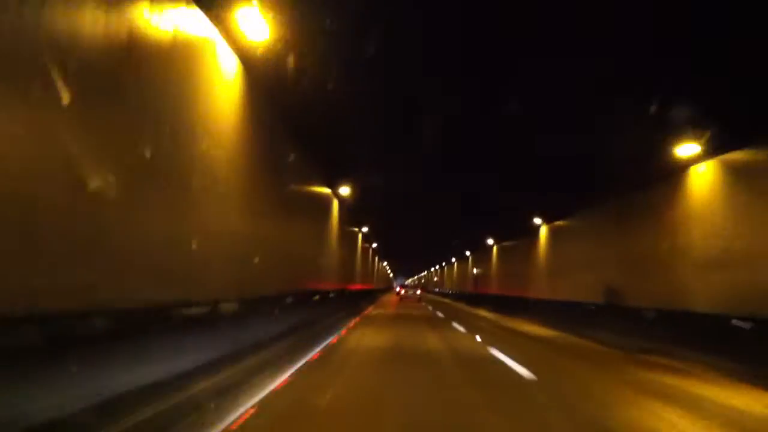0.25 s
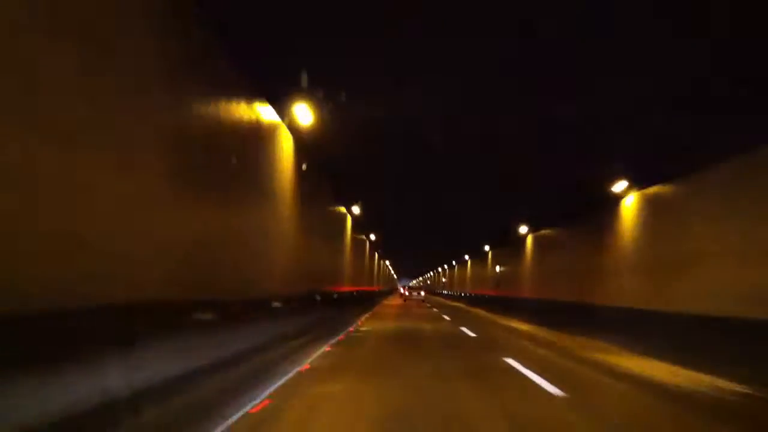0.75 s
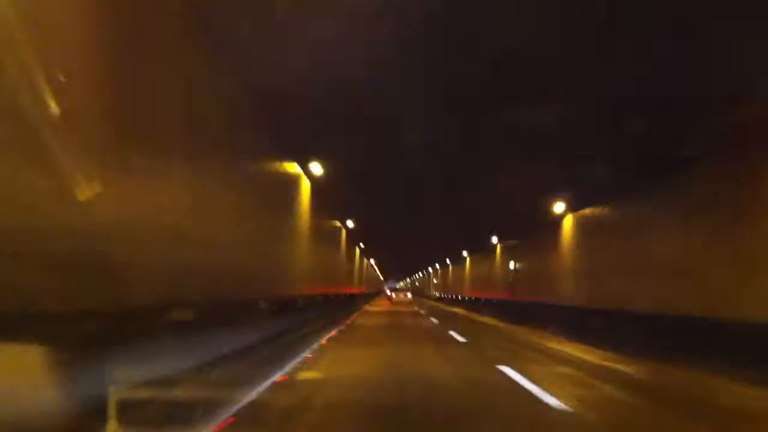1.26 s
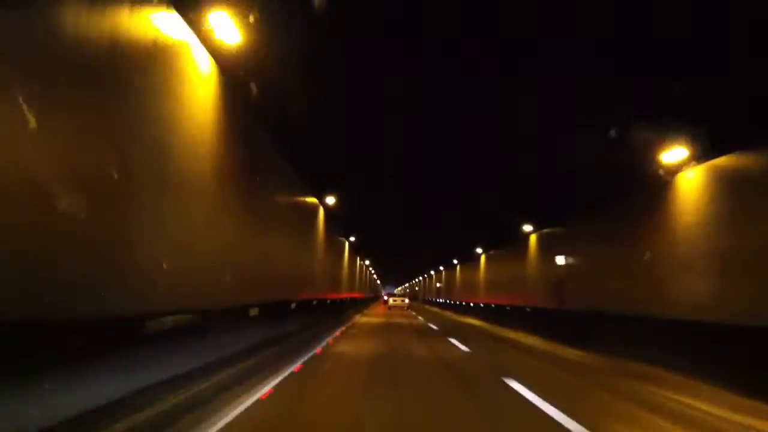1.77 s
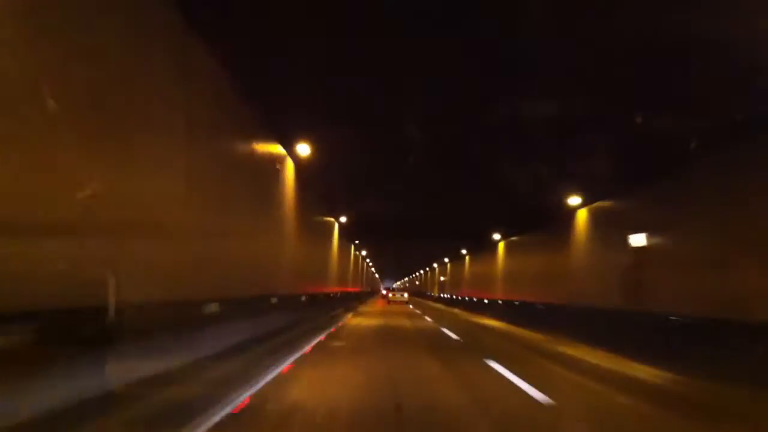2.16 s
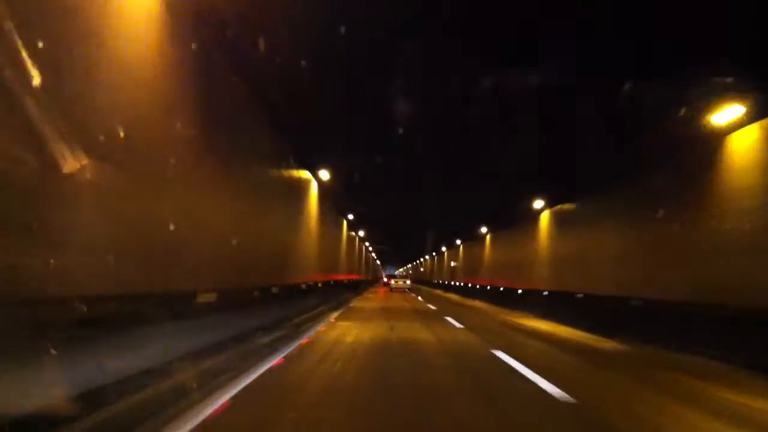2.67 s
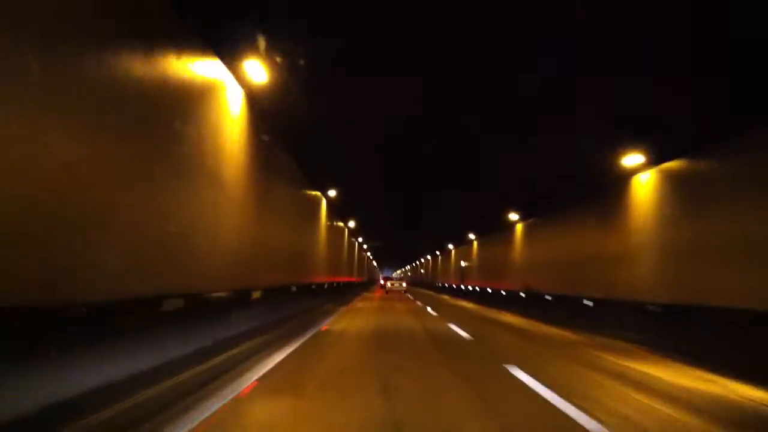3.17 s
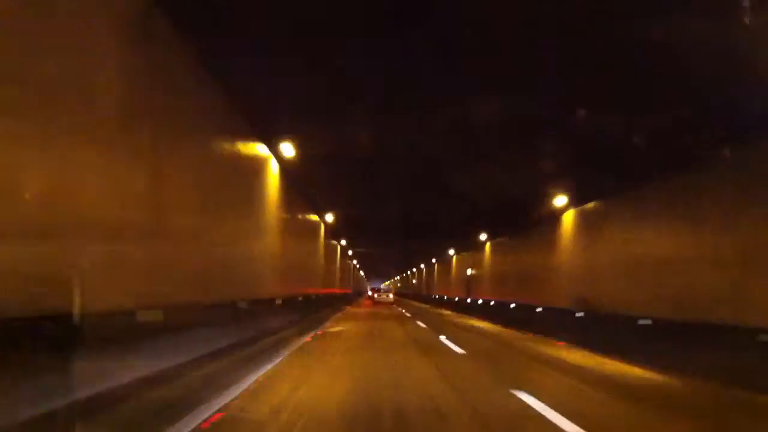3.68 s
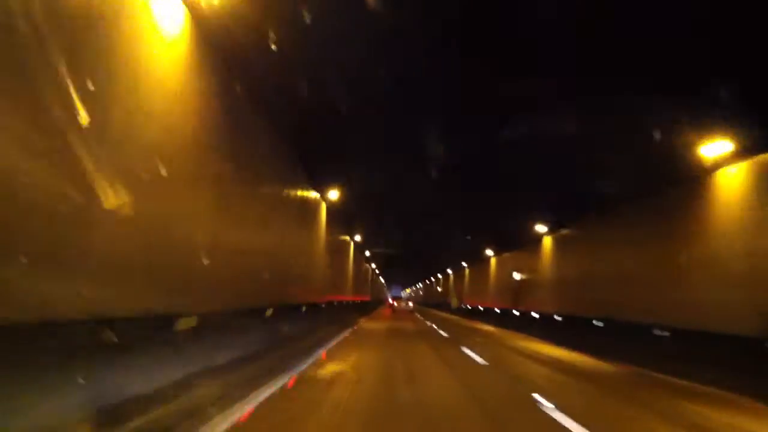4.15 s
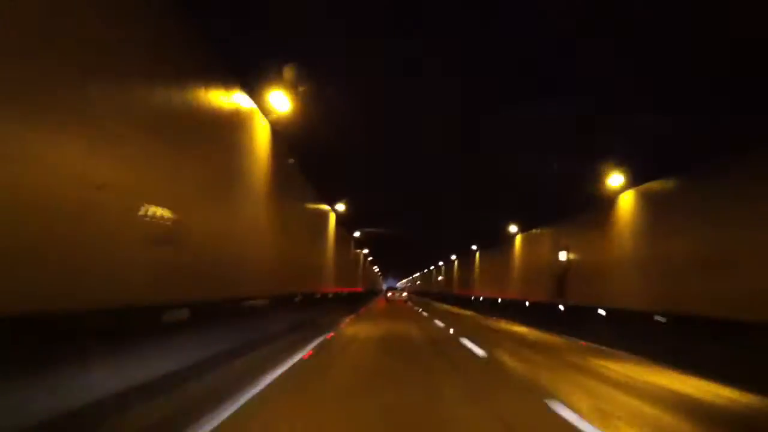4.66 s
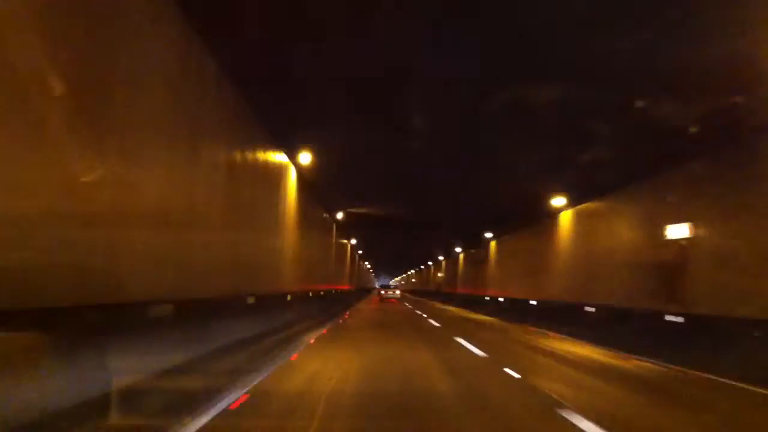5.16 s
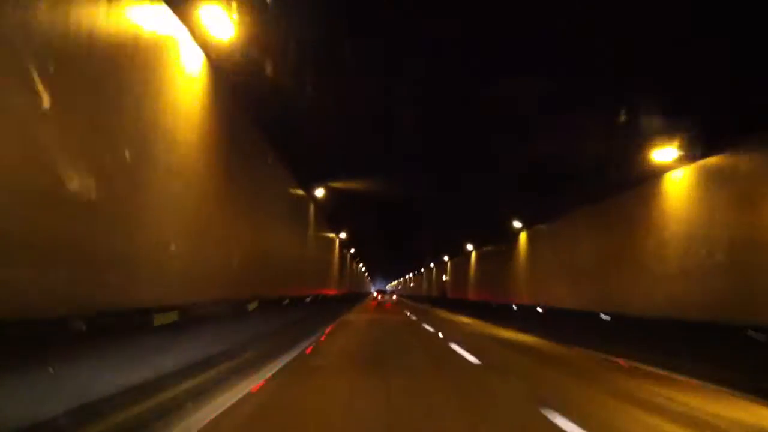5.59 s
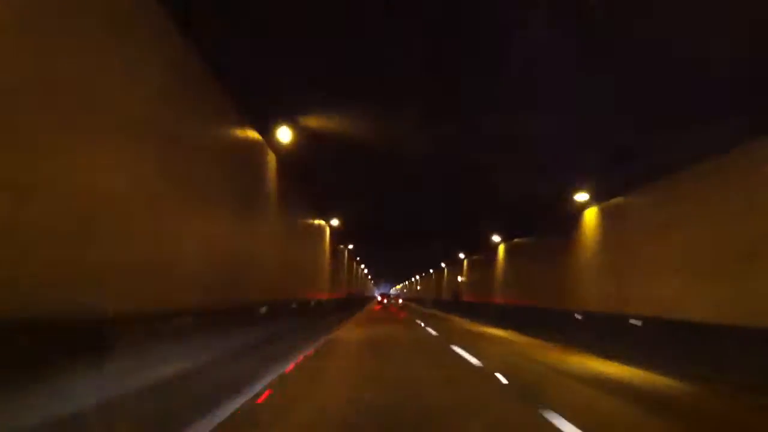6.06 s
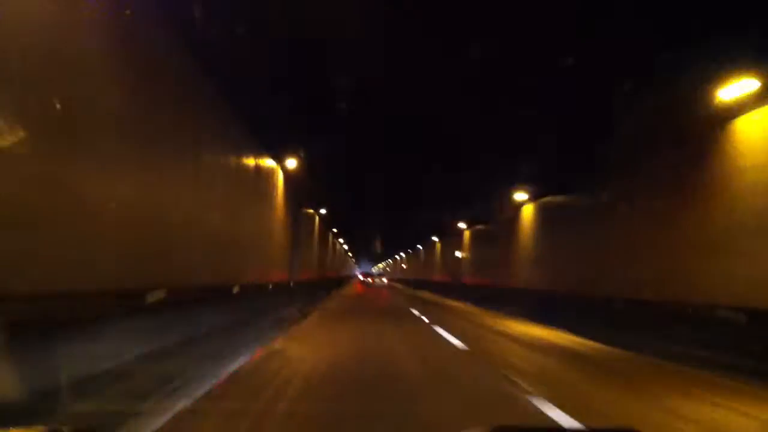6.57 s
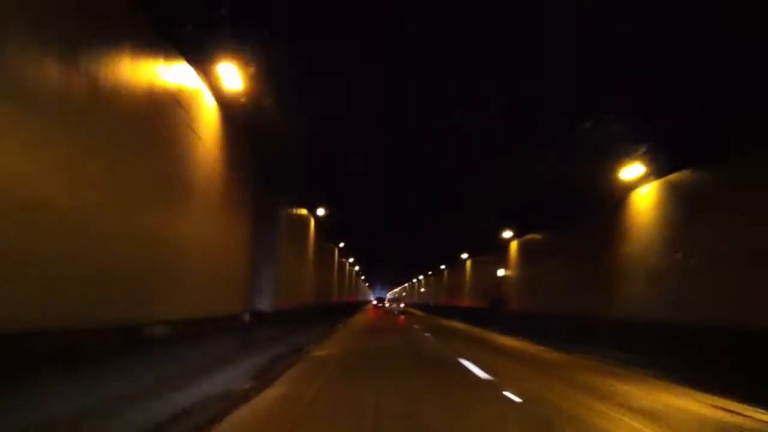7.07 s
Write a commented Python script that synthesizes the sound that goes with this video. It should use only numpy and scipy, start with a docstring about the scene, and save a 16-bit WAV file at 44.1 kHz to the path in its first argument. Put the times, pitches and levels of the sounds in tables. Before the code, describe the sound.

Throughout about 7.3 seconds, a car cruises at nearly constant speed through a walled tunnel, heard in mono from inside the closed cabin. Low, uneven body booms and a rattly-free panel drone dominate, fluttering quickly with the asphalt and briefly dipping or surging. Over them lies smooth, dull tyre roar with a very faint hiss of air, easing slightly toward the end. A low engine hum wavers, and thin, faint gear whines swell and fade, the highest more noticeable around 4.4 and 5.2 seconds. Barely audible rustles occur near 2.15 and 2.6. Soft knocks and pitched booms cluster at 2.4-2.65; a lighter knock comes at 3.8, a strong boom surge at 4.3, firmer bumps at 4.9-5.05, then thuds at 5.8 and 6.4. The steady rumble continues to the end.

```python
"""Car cabin in a road tunnel

A car cruises at nearly steady speed through a walled road tunnel, heard in mono from inside the cabin.
Uneven asphalt drives body resonances with noise: low booms and panel drone, with single-pitch surges.
Coloured noise makes the tyre roar and air hiss through the glass, road knocks and a few faint rustles.
Sines tied to one shaft speed make the engine hum and three thin gear whines that swell and fade."""
import sys
import numpy as np
from scipy import signal
from scipy.fft import rfft, irfft, next_fast_len
from scipy.io import wavfile
from scipy.ndimage import uniform_filter1d

SR = 44100
rng = np.random.default_rng(int(sys.argv[2]) if len(sys.argv) > 2 else 0)


def generate_wav(signal):
    """Clip the signal to [-1, 1] and save it as 16-bit WAV at the path in sys.argv[1]."""
    frames = np.transpose(np.atleast_2d(signal))
    scaled = np.clip(frames, -1, 1) * 32767
    pcm = np.round(scaled).astype(np.int16)
    wavfile.write(sys.argv[1], SR, pcm)


N = 323253
TIME = np.arange(N) / SR
SIZE = next_fast_len(N, real=True)
FREQ = np.maximum(np.arange(SIZE // 2 + 1) * SR / SIZE, 1)   # Hz, kept off zero


def from_db(db):
    """Decibels to gain."""
    return 10 ** (np.asarray(db) / 20)


def rms_one(x):
    """Scale to unit power."""
    return x / np.sqrt(np.mean(x ** 2) + 1e-20)


def in_time(rows):
    """Each column of a curve table, interpolated at every sample."""
    s, *columns = np.transpose(rows)
    return [np.interp(TIME, s, column) for column in columns]


def colour(points):
    """Gain at every frequency from a short spectrum, interpolated over log frequency."""
    hz, db = np.transpose(points)
    return from_db(np.interp(np.log(FREQ), np.log(hz), db))


def resonance(hz, width):
    """Gain of a steep-sided resonance: 1 on top, about half at width / 2 to either side."""
    return 1 / (1 + ((FREQ ** 2 - hz ** 2) / (FREQ * width)) ** 2)


def noise(gain):
    """Random forcing through a frequency response, at unit power."""
    spectrum = rfft(rng.standard_normal(SIZE)) * gain
    return rms_one(irfft(spectrum, SIZE)[:N])


def drift(rate_hz):
    """Slow random wander with unit spread."""
    return noise(1 / (1 + (FREQ / rate_hz) ** 2))


def steady(x, span_s):
    """Even out slow swells and keep the fast beating."""
    size = max(int(span_s * SR), 8)
    power = uniform_filter1d(uniform_filter1d(x ** 2, size), size)
    return x / np.sqrt(np.maximum(power, 1e-9))


def hump(s, length):
    """A smooth bell of height 1 around time s; length is its standard deviation."""
    return np.exp(-.5 * np.minimum(((TIME - s) / length) ** 2, 100))


def rustles():
    """Faint rustles in the cabin: short, rounded bursts of high noise."""
    # bursts: (time [s], level [dB], length [s])
    bursts = [(2.148, -66.5, .008), (2.180, -67, .009), (2.57, -73, .02)]
    # relative spectrum: (frequency [Hz], density [dB per Hz])
    rustle_colour = [(3000, -32), (7000, -4), (9000, 0), (12000, -13), (14000, -28)]
    envelope = sum(from_db(db) * hump(s, length) for s, db, length in bursts)
    return envelope * noise(colour(rustle_colour))


def boom_dips():
    """Brief dips in the boom, as a level change in dB."""
    # dips: (time [s], length [s], change [dB])
    dips = [(0.92, 0.026, -7), (1.234, 0.012, -14), (2.074, 0.013, -3), (2.42, 0.01, -5.5),
            (2.67, .008, -12), (2.92, 0.035, -6), (3.898, 0.026, -8), (4.157, 0.017, -12),
            (4.684, 0.037, -12), (4.89, 0.0065, -5), (5.287, 0.033, -10), (5.763, .008, -6),
            (5.86, 0.0079, -5), (6.397, 0.0058, -7), (7.09, 0.016, -2.5)]
    return sum(db * hump(s, length) for s, length, db in dips)


def whine(hz, level_db):
    """A nearly pure gear tone that wanders a little in pitch and flutters in strength and phase."""
    wander_hz, flutter = 1.5, .37   # pitch spread; flutter relative to the steady tone
    phase = 2 * np.pi * np.cumsum(hz + wander_hz * drift(5.16)) / SR
    in_phase = (1 + flutter * drift(16)) * np.sin(phase)
    quadrature = flutter * drift(26) * np.cos(phase)
    return from_db(level_db) * rms_one(in_phase + quadrature)


def drivetrain():
    """One shaft speed sets the low engine hum and three gear whines; the hum dips with the boom."""
    # engine speed: (time [s], speed [turns per s])
    speed = [(0, 29.60), (1.4, 29.72), (2.6, 29.58), (4.4, 29.47), (5.5, 29.47), (7.33, 29.56)]
    # hum before its waver and dips: (time [s], lower level [dB], middle level [dB], upper level [dB])
    hum_levels = [(0, -34, -29, -42), (.25, -47, -32.5, -36.5), (.7, -40, -38.5, -29.5),
                  (1.05, -39, -27.5, -39), (1.5, -36, -34.5, -34.5), (2.1, -39, -34.5, -40),
                  (3.0, -39, -35, -36.5), (3.45, -36, -43, -36), (4.0, -47, -43, -41),
                  (4.3, -48, -32.5, -33.5), (4.55, -49, -27, -44.5), (5.25, -37, -43, -36.5),
                  (5.85, -39.5, -29.5, -43), (6.35, -42, -38, -32.5), (6.75, -44, -35, -37.5),
                  (7.33, -33, -32.5, -40)]
    # the three hum tones: one order each [cycles per turn]
    orders = [4, 5, 6]
    # gear whines, one table each: (time [s], level [dB])
    lower_levels = [(0, -45), (0.35, -56), (.65, -48.5), (1.15, -44.5), (1.35, -50.5), (1.8, -58),
                    (2.35, -45), (2.55, -49), (2.85, -50), (3.4, -48), (3.7, -51), (3.9, -45.5), (4.2, -54),
                    (4.95, -52.5), (5.25, -47), (5.85, -44.5), (6.3, -55), (7.33, -56.5)]
    middle_levels = [(0, -63), (.7, -54), (1.25, -49.5), (1.65, -49), (2, -60.5), (5.8, -64.5),
                     (6.25, -52.5), (6.9, -67), (7.33, -67)]
    upper_levels = [(0, -58), (0.15, -44.5), (.35, -47.5), (0.55, -51), (0.75, -48.5), (1.55, -49.5),
                    (1.82, -58), (2, -48), (2.3, -46), (2.4, -56), (3, -60), (4.1, -60), (4.28, -49),
                    (4.45, -42.5), (4.6, -52), (4.75, -59), (4.95, -46), (5.07, -50), (5.2, -42),
                    (5.4, -44.5), (5.55, -58), (5.8, -58), (5.95, -49.5), (6.48, -50), (6.65, -68),
                    (7.33, -62)]
    lower_mesh, middle_mesh, upper_mesh = 34.4, 39.45, 45   # cycles per turn
    waver_db, sway_rad = 1.5, 0.25   # spread of the hum's waver in level and phase
    dip_share = .7                   # how far the hum follows the dips of the boom

    turns_hz, = in_time(speed)
    angle = 2 * np.pi * np.cumsum(turns_hz) / SR
    hum = 0
    for order, level_db in zip(orders, in_time(hum_levels)):
        gain = from_db(level_db + waver_db * drift(4)) * np.sqrt(2)   # RMS level to peak
        phase = order * angle + sway_rad * drift(1.7) + rng.uniform(0, 2 * np.pi)
        hum = hum + gain * np.sin(phase)
    lower = whine(lower_mesh * turns_hz, *in_time(lower_levels))
    middle = whine(middle_mesh * turns_hz, *in_time(middle_levels))
    upper = whine(upper_mesh * turns_hz, *in_time(upper_levels))
    return hum * from_db(dip_share * boom_dips()) + lower + middle + upper


def rolling():
    """Tread roar smoothed by the tunnel and dulled by the glass, with air rushing over the car."""
    # tyre roar: (time [s], level [dB])
    roar_levels = [(0, -34), (.7, -35.5), (2.8, -35.5), (4.7, -36.5), (4.95, -36), (5.7, -36.5),
                   (7.33, -37)]
    # tread and window resonances that stand out of the roar: (centre [Hz], width [Hz], rise [dB])
    roar_peaks = [(570, 24, 6), (773, 53, 5.5), (835, 15, 6), (1040, 54, 1.5), (1157, 45, 1.5),
                  (1159, 28, 0.5), (1878, 28, 3.5), (2284, 92, 3), (2553, 67, 4.5), (2690, 34, 4.5)]
    # relative spectra of roar and hiss: (frequency [Hz], density [dB per Hz])
    roar_colour = [(20, -13.5), (50, -4.5), (90, 12), (300, 13), (500, 8), (660, 4), (880, 3.5), (960, 8),
                   (1330, 5.5), (1420, 3.5), (2100, -2.5), (2900, -6), (3300, -12.5), (11000, -70)]
    hiss_colour = [(1500, -20.5), (3000, -4), (3900, 0.5), (4600, -3), (5200, -8), (5900, -14.5),
                   (8500, -16), (10200, -19.5), (11500, -27), (13000, -36), (15000, -58)]
    mean_hiss_db, hiss_follows = -59.5, 0.6   # hiss at mean roar; its share of the roar's swing

    roar_db, = in_time(roar_levels)
    hiss_db = mean_hiss_db + hiss_follows * (roar_db - roar_db.mean())
    peaks_db = sum(db * resonance(hz, width) for hz, width, db in roar_peaks)
    texture = drift(7.7)      # the grain of the road moves roar and hiss together
    roar = from_db(roar_db + 0.38 * texture) * noise(colour(roar_colour) * from_db(peaks_db))
    hiss = from_db(hiss_db + 0.36 * texture) * noise(colour(hiss_colour))
    return roar + hiss


def knocks():
    """Each flaw in the asphalt jolts an octave that dies away quickly; soft rubber dulls the treble."""
    # flaws under the tyres: (time [s], level [dB], decay [s], centre [Hz])
    flaws = [(2.437, -27.5, 0.028, 285), (2.54, -34, .025, 290), (2.635, -29.5, 0.012, 320),
             (3.815, -34, 0.022, 327), (4.889, -36, 0.02, 620), (4.916, -26, 0.017, 268),
             (4.915, -37.5, 0.014, 1300), (4.975, -37, 0.035, 1280), (5.055, -29, 0.011, 290),
             (5.362, -41, 0.02, 1740), (5.773, -33.5, 0.016, 680), (5.781, -26.5, 0.019, 315),
             (5.8, -37, 0.019, 640), (6.416, -29, 0.04, 334), (6.43, -36.5, 0.019, 1110),
             (6.433, -32, 0.024, 666)]
    attack_s = 0.0018
    out = np.zeros(N)
    for s, db, decay_s, hz in flaws:
        near = np.abs(TIME - s) < .3
        t = TIME[near] - s
        envelope = np.exp(np.where(t < 0, -.5 * (t / attack_s) ** 2, -t / decay_s))
        octave = signal.butter(3, [hz / np.sqrt(2), hz * np.sqrt(2)], "band", fs=SR, output="sos")
        jolt = steady(signal.sosfilt(octave, rng.standard_normal(len(t))), span_s=0.012)
        out[near] += from_db(db) * envelope * jolt
    rubber = signal.butter(4, 2800, fs=SR, output="sos")
    return signal.sosfilt(rubber, out + 1e-18)   # tiny offset keeps the filter off vanishing numbers


def with_surges(boom):
    """Strongest surges of the boom: the noise gives way to a few even swings at one pitch."""
    # surges: (time [s], length [s], level [dB], pitch [Hz])
    surges = [(.227, 0.015, -21.5, 148), (.429, 0.011, -21, 144), (1.403, 0.012, -20, 163),
              (2.234, 0.0087, -24, 135), (2.467, 0.0078, -18.5, 141), (2.494, 0.0065, -20, 131),
              (2.567, 0.0073, -20.5, 140), (2.598, .012, -17, 119), (2.628, 0.0079, -23.5, 118),
              (4.272, 0.0073, -17, 156), (4.95, 0.015, -17.5, 137.6), (4.995, 0.014, -19, 130),
              (5.072, 0.017, -19.5, 123), (5.813, 0.021, -20, 149), (6.334, 0.0087, -17, 142),
              (6.446, 0.021, -20.5, 152.5)]
    mask_share = 0.84   # share of the random boom that gives way
    swings, taken = 0, 0
    for s, length, db, hz in surges:
        envelope = hump(s, length)
        cycles = hz * (TIME - s) + rng.random()
        swings = swings + from_db(db) * envelope * np.sqrt(2) * np.sin(2 * np.pi * cycles)
        taken = taken + envelope
    return boom * (1 - np.clip(mask_share * taken, 0, 1)) + swings


def shaken(modes, level_db):
    """A group of modes driven at random by the road."""
    power = sum((from_db(db) * resonance(hz, width)) ** 2 for hz, width, db in modes)
    # strength is evened out over this span and beats freely within it
    return from_db(level_db) * steady(noise(np.sqrt(power)), span_s=0.086)


def body():
    """Cabin booms and panels drone with the asphalt, rising and falling briefly; little lies below."""
    # coarseness of the asphalt, as the shaking of the body: (time [s], level [dB])
    road = [(0, -25), (1.25, -27.5), (1.9, -25), (3.0, -27), (3.6, -25), (4.05, -27.5), (4.4, -27),
            (4.9, -27.5), (5.27, -25.5), (5.55, -26.5), (6.3, -25), (7.33, -28.5)]
    # brief rises and falls of the deep boom, upper boom and panel drone:
    # (time [s], length [s], deep change [dB], upper change [dB], panel change [dB])
    brief_changes = [(0.21, 0.023, -5, 7.5, 0), (0.674, 0.072, -2.5, -4.5, 3.5), (0.86, 0.049, 7, -10, 1.5),
                     (1.072, 0.13, 1, 0.5, 2.5), (1.5, 0.027, 5, 5.5, 5), (1.895, 0.02, 2, 7.5, 4.5),
                     (1.997, 0.029, 6, 3, -6), (2.127, 0.017, -6, 7, -1), (2.576, 0.085, 4, 3.5, 3.5),
                     (3.294, 0.044, 5.5, -13, 1), (3.49, 0.041, 3, 0, -4.5), (3.82, 0.027, 11, 2.5, 2),
                     (4.27, 0.018, 5, 4, 3.5), (4.845, 0.03, 8.5, 3.5, 3.5), (5.0, 0.042, 8, 3, 1.5),
                     (5.424, 0.031, 5, -0.5, -2.5), (6.443, 0.028, 4, -2, 6.5), (6.537, 0.025, 8, 4, -0.5),
                     (6.774, 0.021, 6, 0, -5.5), (7.282, 0.034, -1, 6.5, -0.5)]
    # body and cabin-air resonances, relative within a group: (centre [Hz], width [Hz], level [dB])
    deep_modes = [(83.3, 12, -16), (108.3, 13, -5), (114.9, 9, 0), (124.2, 3.9, 0)]
    upper_modes = [(137.7, 16, -8.5), (146.6, 17, -2.5), (162.7, 8.3, -2), (175.3, 5.4, -6),
                   (188.7, 5.6, -5)]
    panel_modes = [(205.4, 29, 2), (250.4, 39, 1.5), (258, 64, -2.5), (290.4, 9.8, -0.5), (331, 49, -1.5),
                   (375.2, 46, -0.5), (410.3, 12.6, 4), (427.4, 75, -7)]
    deep_share_db, upper_share_db, panel_share_db = -7.5, -3.5, -10   # relative to the shaking

    road_db, = in_time(road)
    change_db = sum(np.outer(steps_db, hump(s, length)) for s, length, *steps_db in brief_changes)
    deep_db, upper_db, panel_db = road_db + change_db
    dip_db = boom_dips()
    deep_boom = shaken(deep_modes, deep_share_db + deep_db + dip_db)
    upper_boom = shaken(upper_modes, upper_share_db + upper_db + dip_db)
    drone = shaken(panel_modes, panel_share_db + panel_db)
    low_limit = signal.butter(8, 74.4, "high", fs=SR, output="sos")
    return signal.sosfilt(low_limit, with_surges(deep_boom + upper_boom) + drone)


def scene():
    """Everything that reaches one microphone inside the cabin."""
    return (rustles() + drivetrain() + rolling() + knocks() + body())[None]


def record(dry):
    """The top is cut steeply above 13.5 kHz."""
    return signal.sosfilt(signal.butter(14, 13500, fs=SR, output="sos"), dry)


dry = scene()
out = record(dry)
generate_wav(out)
```